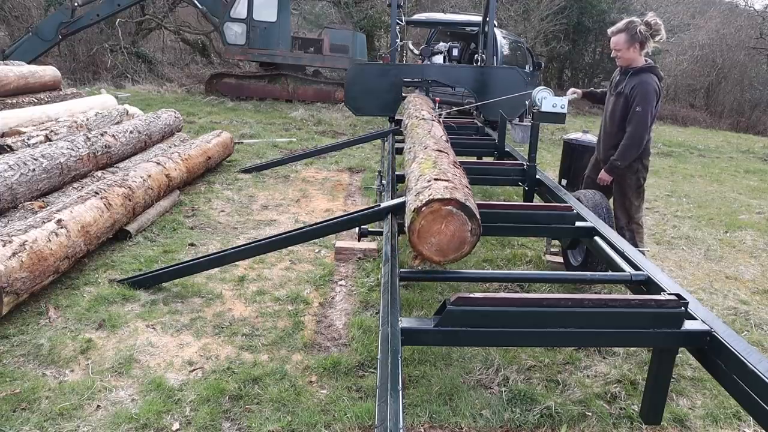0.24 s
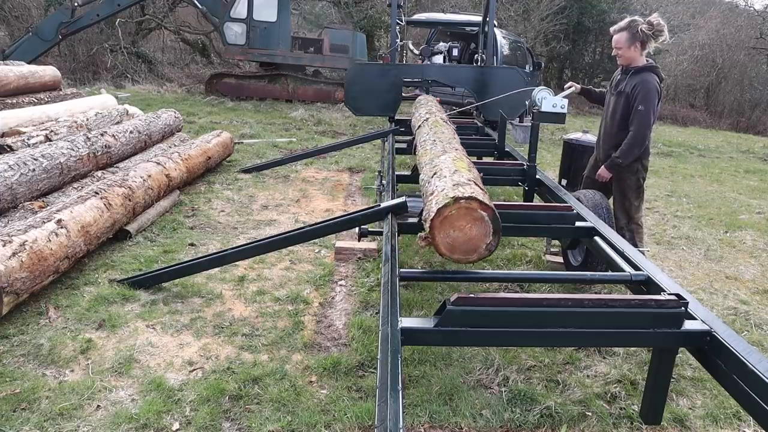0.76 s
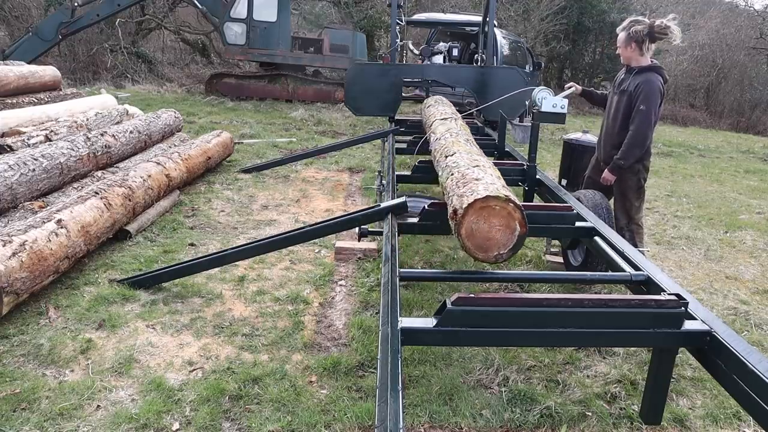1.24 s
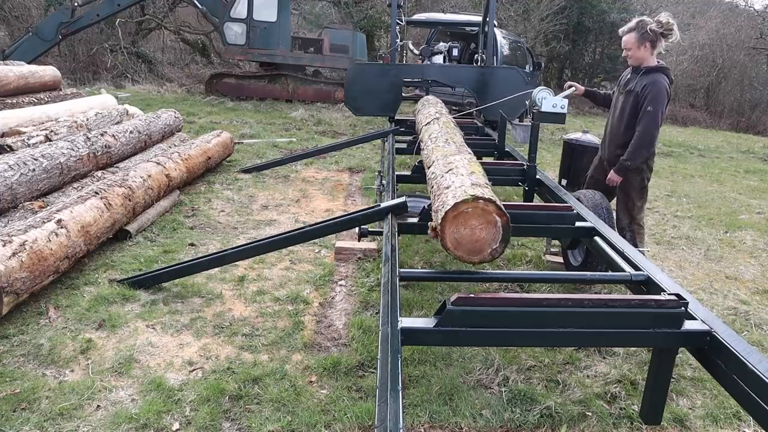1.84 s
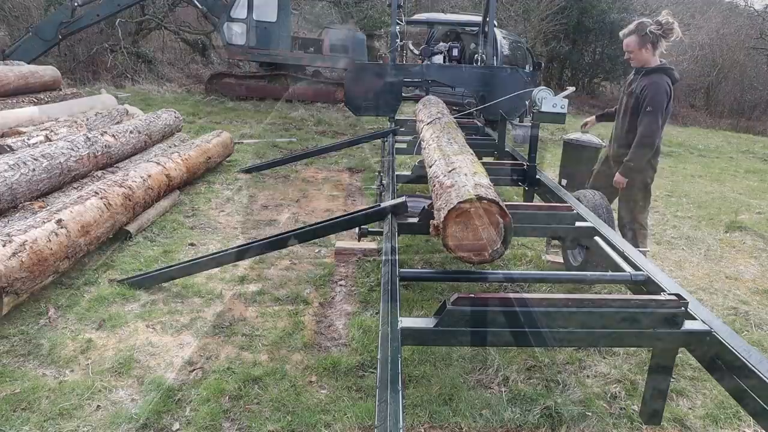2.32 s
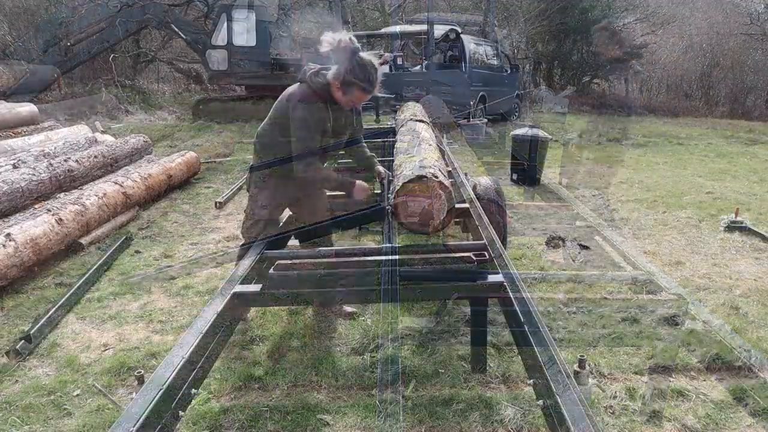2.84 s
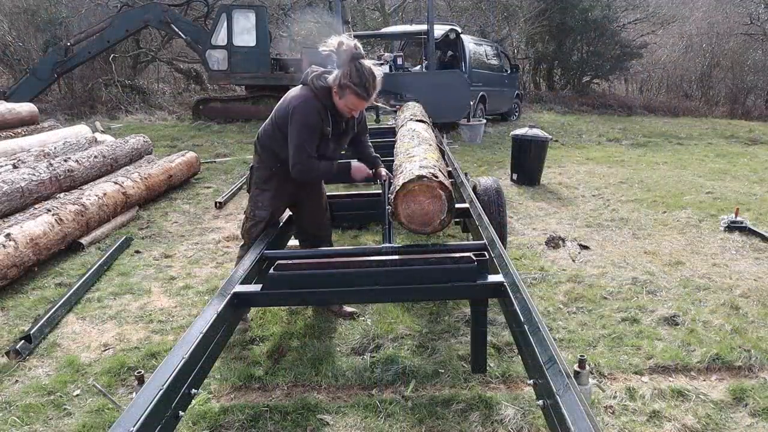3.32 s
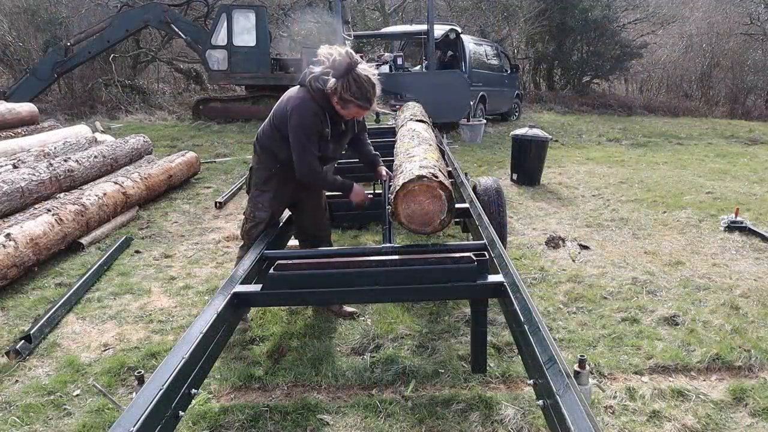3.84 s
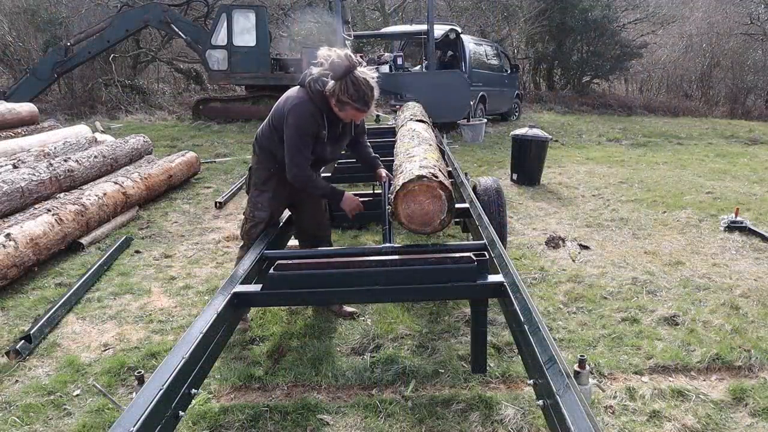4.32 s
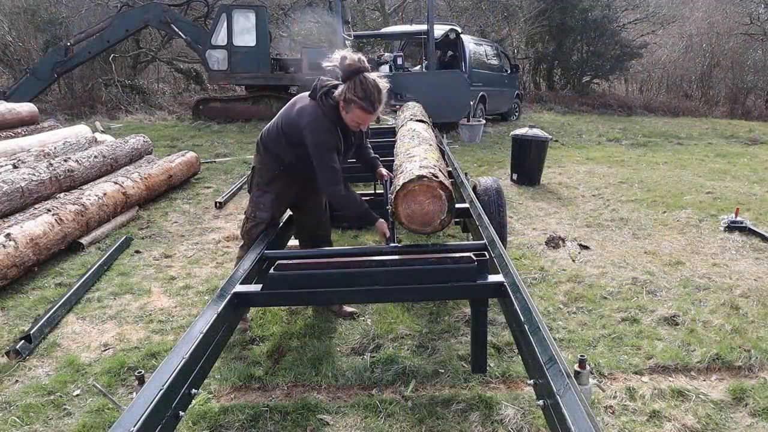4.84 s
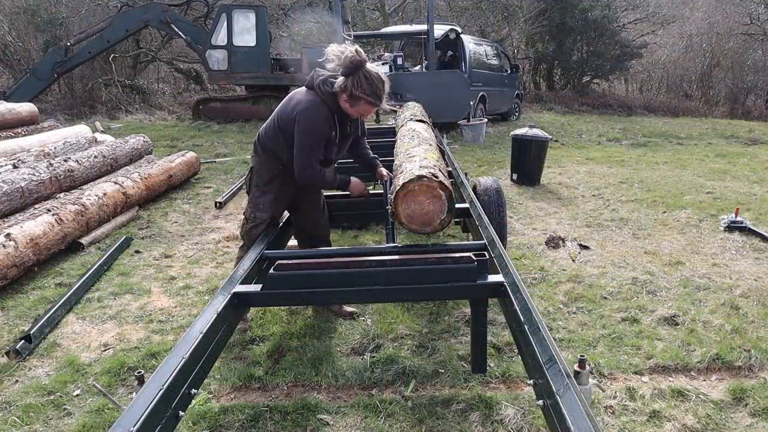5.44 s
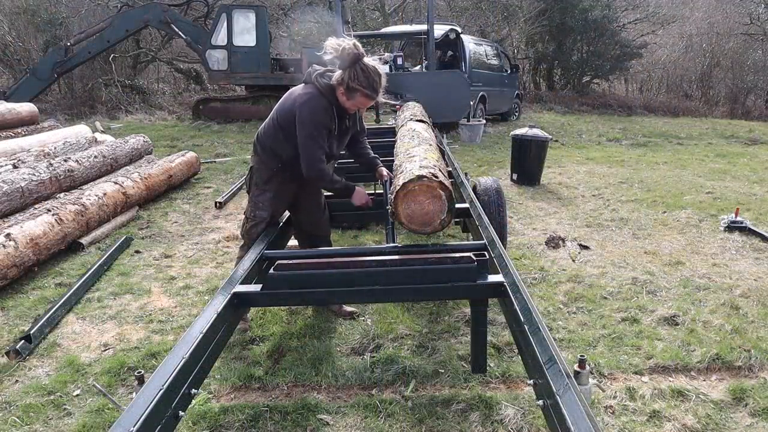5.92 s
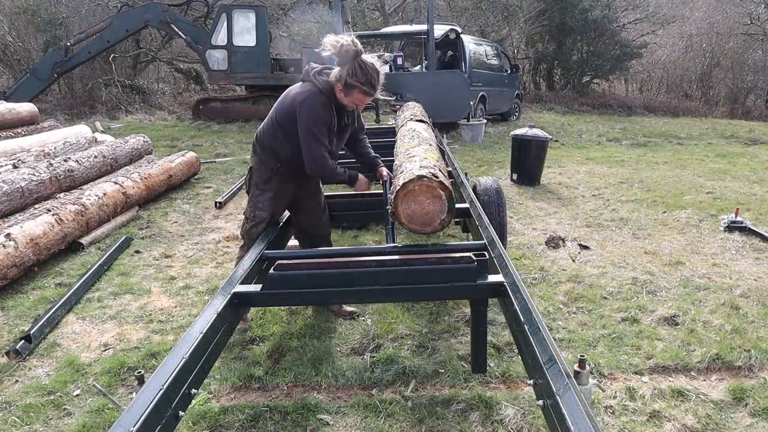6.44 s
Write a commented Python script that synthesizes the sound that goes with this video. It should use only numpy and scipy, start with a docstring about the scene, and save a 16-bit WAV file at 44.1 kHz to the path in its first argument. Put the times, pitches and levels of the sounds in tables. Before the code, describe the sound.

A burst of rapid ratchet clacks slows and stops within half a second. Wind rumble drops away, leaving quiet air and small high birds. Leafy wash swells back while a clamp rattles softly, then knocks hard on a steel bed several times. After a strong gust, a double-edged slam booms and rings, followed by faint ticks and rubbing. Open field, wind-struck stereo microphone.

```python
"""A hand winch drags a log onto a steel sawmill bed: grinding gears, clacking pawl, a drum squeaking between teeth.
As it stops, gears and cable settle and small birds whistle; the wash of wind in the trees sinks, then returns.
A log clamp is knocked along the bed, a sleeve brushes past, and the clamp slams home with a ringing clank.
Wind buffets the microphone throughout. Metal is contact grains through decaying rings, or tones for squeaks
and hums; birds are gliding tones; wind is shaped noise and single pressure pulses."""
import sys
import numpy as np
from scipy import signal
from scipy.fft import rfft, irfft, next_fast_len
from scipy.io import wavfile

SR = 44100
rng = np.random.default_rng(int(sys.argv[2]) if len(sys.argv) > 2 else 0)


def digitize_waveform(pressure):
    """Quantize a signal to 16-bit integers and store it at the path in sys.argv[1].

    Rows of a 2-D input are taken as channels; values are limited to [-1, 1].
    """
    field = np.atleast_2d(pressure).T
    bounded = np.clip(field, -1, 1)
    quanta = np.round(bounded * 32767).astype(np.int16)
    wavfile.write(sys.argv[1], SR, quanta)


N = 294139

# Levels are relative: each source's own trim comes on top.
# pawl dropping off a tooth: (time [s], level [dB], fade-in of sliding contacts [s])
PAWL_DROPS = [(.005, -17.5, .006), (.056, -16.5, 0.0092), (.102, -18, 0.0087), (.142, -20, 0.0024),
              (.218, -22.5, 0.0022), (0.303, -17.5, 0.0012), (.362, -18, 0.0093), (0.449, -32, 0.0029),
              (.474, -17.5, 0.0049)]
# gears and cable settling as the crank stops: (time [s], level [dB], decay of rattle [s])
SETTLING = [(.517, -41.5, 0.0052), (0.563, -57, 0.013), (.603, -47, 0.0058), (0.644, -50, .005),
            (.719, -53, 0.0049), (0.751, -44, 0.0023), (.766, -41.5, .008), (.792, -44.5, .014),
            (.848, -62, .006), (0.957, -49, 0.022), (1.05, -61, .004), (1.107, -49, .012)]
# duller tone of those soft contacts: (frequency [Hz], gain [dB])
SETTLING_TONE = [(900, 6), (2500, -0.5), (4500, -1), (9000, -12)]
# winch housing's colour: (frequency [Hz], level [dB per Hz]); its ring: (frequency [Hz], t60 [s])
WINCH_COLOUR = [(250, -4.5), (560, -12), (850, -3.5), (1020, -6.5), (1200, -2), (1470, -11), (1750, 8.5),
                (2000, -2.5), (2280, 6.5), (2700, -2), (4300, -3.5), (4750, -6.5), (5200, 1.5),
                (5700, -6.5), (10500, -8), (12500, -27), (15000, -65)]
WINCH_T60 = [(500, 0.12), (1800, 0.04), (5000, 0.053), (11000, 0.05)]
# modes of the winch frame: (frequency [Hz], level [dB], t60 [s])
FRAME_MODES = [(510, -3, 0.16), (612, -4, .25), (887, 4.5, 0.077), (1795, -1, 0.19), (1845, 2, .14),
               (2110, 3, 0.07), (2296, -3, 0.093), (2810, 2, .1), (4830, -3.5, 0.36), (5100, 0, 0.086),
               (5500, -0.5, .076)]

# a louder drop is a full tooth under load; the slowing of the crank counts from the fast tooth
FULL_TOOTH_DB, FAST_TOOTH_S = -27, .05
# the drum sticks after each clack, then slips with an arching pitch that is higher on longer teeth
SQUEAK_HZ, SQUEAK_HZ_PER_S, SQUEAK_ARCH_HZ = 8970, 1600, 312
STICK_SHARE, SQUEAK_DB, SQUEAK_DB_PER_HALVING = 0.13, -44.5, -5
# the gears soften each time the speed halves, and die away after the last tooth
GRIND_DB, GRIND_DB_PER_HALVING, GRIND_STOP_DB_PER_S = -50, -7.5, -110
# under load the pawl bounces once after each drop
BOUNCE_S, BOUNCE_DB, BOUNCE_RATTLE_S = .009, -8.5, 0.005
# it sings briefly as it rides over the tip of each tooth
SING_HZ, SING_DB, SING_LEAD_S, SING_S = 5270, -47.5, .007, .024

# clamp slamming home: (time [s], level [dB], fade-in of sliding contacts [s], decay of rattle [s])
SLAMS = [(4.909, -6, 0.0025, 0.0039), (4.917, 0, 0.0036, 0.0015), (4.921, 3.5, 0.003, 0.0022)]
# colour of the slam: (frequency [Hz], level [dB per Hz]); its ring: (frequency [Hz], t60 [s])
SLAM_COLOUR = [(88, -23), (150, -36), (470, -16), (720, -5.5), (940, 10), (1220, 2.5), (1400, -9),
               (1650, -6), (2050, -4.5), (2400, -13.5), (3050, -19), (3370, -10.5), (3550, -10),
               (3800, -15), (4150, -22), (4600, -21), (5200, -15.5), (6600, -28), (10900, -34.5),
               (15500, -62)]
SLAM_T60 = [(200, 0.095), (1000, 0.0078), (4000, 0.047), (12000, 0.055)]
# colour of the bed: (frequency [Hz], level [dB per Hz]); its ring: (frequency [Hz], t60 [s])
BED_COLOUR = [(50, -18), (130, 6), (350, -6), (600, 9), (950, 8.5), (1400, 2), (1850, 8), (2400, -5),
              (3800, -6), (4500, -17), (5200, -6), (7000, -19), (14000, -44)]
BED_T60 = [(120, 0.7), (500, 0.29), (1800, 0.27), (4000, 0.3), (10000, 0.043)]
# ringing modes of the steel bed and clamp: (frequency [Hz], level [dB], t60 [s])
STEEL_MODES = [(230, -24, 1.8), (296, -14, 0.55), (361, -20, 0.44), (505, -6, .3), (608, -2, 0.26),
               (810, -23, 0.4), (920, -5, 0.28), (970, -1.5, 0.33), (1011, -6.5, 0.48), (1557, -23, 0.88),
               (1590, -23, 1.7), (1756, -3.5, 0.48), (1814, -9, 0.45), (1890, -22, 1.2), (2067, -2, 0.11),
               (2300, -21.5, 0.66), (2560, -16, 0.38), (3400, -28, 0.27), (3779, 2, 0.1), (4020, -18, 0.32),
               (3840, -14.5, 0.22), (5020, -12, 0.24), (5210, 2.5, 0.074), (8100, -32, 0.38)]
# thin, long ring of the clamp bar: (frequency [Hz], level [dB], t60 [s])
BAR_MODES = [(9437, -4, 1.6), (9430, -18, 1.7)]

# clamp knocking on the bed: (time [s], level [dB], brightness above 2.5 kHz [dB], clang near 1.9 kHz [dB],
# body below 700 Hz [dB], decay of rattle [s], pitch of the boom [Hz])
KNOCKS = [(2.198, -36, -22, -11, -9, 0.0019, 600), (2.26, -37.5, -13, -1, 5.5, 0.006, 612),
          (2.356, -40, -12, -2, 3, .002, 570), (2.377, -36, -9, 2.5, 6, 0.0074, 710),
          (2.469, -27, -13, 0, 5, 0.017, 547), (2.524, -35, -16, -2, -7, 0.0012, 596),
          (2.601, -35.5, -10, -8, 12.5, 0.0027, 535), (2.611, -28.5, -5, -2, 2.5, 0.014, 630),
          (2.661, -29.5, -8, -12, 6.5, 0.008, 806), (2.679, -19.5, -1, -3.5, 4, 0.0076, 712),
          (2.686, -28, -7, -3.5, 8.5, 0.01, 808), (2.715, -37, -12, -12, 16, 0.0082, 516),
          (2.788, -27, -9, -9, -2, .002, 686), (2.8, -39, -12, -10, 15, 0.0055, 544),
          (3.157, -7, -12.5, 0, 1, 0.0028, 522), (3.266, -9, -3, -2, -10.5, 0.0089, 690),
          (3.274, -9, -11, 1, -5, 0.0028, 544), (3.283, -14, 0, 1.5, 5, 0.0031, 625),
          (3.48, -19, 5, 1, -4.5, 0.00094, 873), (3.512, -12, -23, -5.5, -1.5, 0.0036, 531),
          (3.632, -24, -20, -1, 0.5, 0.00079, 686), (3.656, -20.5, -11, 2.5, 7, 0.0038, 565),
          (4, -22, -1, -10, -20, 0.0045, 1063), (4.023, -12, -5.5, 5, 2.5, 0.0082, 505),
          (4.985, -22, -22, -12, 3, .005, 504)]
# colour of the clamp: (frequency [Hz], level [dB per Hz]); its ring: (frequency [Hz], t60 [s])
CLAMP_COLOUR = [(100, -27), (260, -9.5), (350, -16), (430, -10), (540, -3), (850, -2), (1150, -1),
                (1400, -8.5), (1800, -4.5), (2050, -5.5), (2280, -33.5), (2650, -8.5), (3050, -21),
                (3550, -7), (4300, -23.5), (5200, -14), (8000, -39.5), (14000, -71)]
CLAMP_T60 = [(250, 0.37), (550, 0.23), (1200, 0.046), (2000, 0.093), (6000, 0.066)]
# modes of the clamp bracket: (frequency [Hz], level [dB], t60 [s])
BRACKET_MODES = [(259.4, -19, 0.17), (416, -10.5, 0.17), (495, -4, 0.22), (622.2, 0.5, 0.14),
                 (695, -8, 0.16), (1001, -13, 0.53), (1061, 9.5, 0.056), (1180, 5, 0.1), (1748, -6.5, 0.29),
                 (1813, -1, 0.16), (1955, -3.5, 0.14), (2046, -19, 0.06), (2617, -7, 0.066),
                 (3710, -17.5, 0.082), (5010, -14, 0.2)]
# boom of the bed: level against the knock's body, time constant of its rise, ring time
BOOM_DB, BOOM_RISE_S, BOOM_T60 = -19.5, 0.0062, .17

# light metal contacts: (time [s], level of the tick [dB], level of the clamp pin's ring [dB])
TICKS = [(0.645, -55, -90), (.683, -59, -90), (.717, -60, -90), (2.369, -50, -54.5), (2.585, -43, -75),
         (2.65, -32.5, -56), (2.771, -38, -75), (3.132, -39, -34), (3.203, -32, -75), (3.481, -21.5, -44),
         (4.005, -67, -42), (4.902, -31, -75), (4.906, -20.5, -61), (5.964, -37.5, -75), (6.255, -37, -67)]
# modes of the clamp pin: (frequency [Hz], level [dB], t60 [s])
PIN_MODES = [(3404, 4, 0.075), (3500, -14, 0.035), (5500, -20, 0.081)]
# rubbing of steel on steel: (time [s], length [s], level [dB], pitch [Hz])
RUBS = [(0.748, 0.073, -62, 900), (0.898, 0.1, -71.5, 930), (1.085, 0.054, -73, 930),
        (2.611, 0.066, -55.5, 2060), (2.614, 0.035, -58, 1870), (3.062, 0.2, -51, 930),
        (5.328, .06, -64, 950), (5.711, 0.07, -60, 930), (6.062, 0.077, -58, 930),
        (6.219, 0.028, -56.5, 930), (6.537, 0.054, -55, 930), (6.628, 0.055, -52.5, 930)]

# bird notes: (time [s], length [s], first pitch [Hz], last pitch [Hz], bend of the middle [Hz], level [dB])
BIRDS = [(0.653, 0.075, 4000, 4000, -84, -76), (.695, 0.062, 6900, 6450, -100, -82),
         (0.785, 0.077, 4270, 3960, -150, -74.5), (0.81, 0.068, 6030, 5500, -250, -76.5),
         (.918, 0.049, 7100, 4900, -500, -74.5), (1.027, 0.09, 4510, 3980, -380, -74),
         (1.032, .035, 4300, 6100, 102, -76), (1.059, 0.053, 6120, 5540, 139, -72),
         (1.136, 0.11, 6100, 6100, -3, -76), (1.174, 0.03, 4200, 6500, 195, -78),
         (1.198, 0.077, 6300, 4660, -280, -76.5), (1.335, 0.071, 5850, 5120, 451, -79),
         (1.35, 0.034, 3130, 3500, 60, -73), (1.41, 0.11, 4980, 4570, -140, -75.5),
         (1.44, 0.089, 7450, 8100, -350, -81), (1.52, 0.032, 5270, 4500, 1, -86),
         (1.59, 0.059, 5500, 5300, -40, -78), (1.813, 0.1, 4860, 4530, -120, -77.5),
         (1.905, .04, 5340, 4600, 0, -84), (2.524, 0.1, 5270, 4700, -300, -64.5),
         (2.844, 0.037, 7300, 6900, -90, -64), (2.883, 0.092, 5400, 4520, -320, -59),
         (3.291, .095, 4640, 3280, 450, -60), (3.665, 0.062, 6770, 4700, -500, -55.5),
         (3.71, 0.043, 4470, 3500, -300, -59.5), (3.988, 0.021, 6700, 3850, -300, -51),
         (4.001, 0.035, 4100, 3830, -53, -50), (4.026, 0.061, 3960, 3320, 376, -50.5),
         (4.107, 0.018, 4550, 4040, 298, -50), (6.248, 0.072, 3830, 3500, 65, -56.5)]

# colour of the trees when calm, then when risen: (frequency [Hz], level [dB per Hz])
CALM_COLOUR = [(180, -27), (300, -3.5), (372, -2), (468, 0), (781, 0.5), (1200, -3.5), (1390, -1.5),
               (5050, -11), (11300, -24.5), (15500, -32.5)]
RISEN_COLOUR = [(120, -23), (200, -2), (249, -1.5), (321, -2.5), (506, 1), (742, 1), (906, 2), (1300, -2),
                (3750, -9), (4030, -10), (8980, -22), (11200, -22.5), (15500, -42)]
# swell of the wind in the trees: (time [s], level [dB])
WASH = [(0, -54), (.6, -69.5), (1.2, -73.5), (1.95, -69.5), (2.25, -64.5), (2.6, -57), (3.05, -51),
        (4.0, -51), (4.7, -51.5), (5.5, -53), (6.6, -52)]

# colour of the wind's buffeting, then of its deep rumble: (frequency [Hz], level [dB per Hz])
BUFFET_COLOUR = [(30, -25.5), (70, -3.5), (110, 3.5), (180, -2), (260, -8.5), (360, -16), (500, -23.5),
                 (1000, -74.5)]
RUMBLE_COLOUR = [(12, 0.5), (25, -5), (50, -1), (75, 1.5), (120, -11.5), (300, -84)]
# breeze at the microphone, then the deep rumble: (time [s], level [dB])
BREEZE = [(0, -49), (.15, -47), (.7, -43), (.8, -46.5), (.9, -62.5), (1.2, -72), (1.95, -62.5), (2.2, -48),
          (3.05, -56.5), (3.2, -46), (3.45, -59), (3.8, -52), (4.25, -43.5), (4.65, -41.5), (5.2, -62),
          (6.67, -58.5)]
RUMBLE = [(0, -64), (.15, -50), (.8, -47.5), (1.0, -91), (1.65, -75), (1.85, -62), (2.1, -77), (3.2, -53.5),
          (3.75, -63), (4.1, -37), (4.55, -43.5), (5.2, -64), (6.45, -55.5), (6.67, -61)]
# flurries of buffeting: (time [s], level [dB])
EDDIES = [(.35, -41), (.485, -38), (0.641, -35.5), (1.538, -47), (2.039, -54.5), (2.121, -44.5),
          (2.166, -43), (2.312, -44), (2.367, -39), (2.494, -45), (4.188, -35), (4.288, -31.5),
          (4.623, -32), (4.669, -35.5)]
EDDY_S = 0.015  # standard deviation of an eddy's bell shape
# how much the two channels differ in the wind: (time [s], level [dB])
UNLIKE = [(0, 1.5), (.82, -0.5), (1.0, -28.5), (3.8, -20.5), (4.1, -3), (4.4, 1.5), (4.6, -16), (6.67, -6)]
# single pressure pulses of the wind: (time [s], peak level [dB], centre frequency [Hz])
THUMPS = [(0.207, -35, 129), (0.25, -38, 210), (.272, -31, 110), (.384, -36, 189), (0.441, -31, 149),
          (0.505, -33, 140), (.533, -35, 286), (0.592, -37, 150), (0.64, -39, 200), (0.685, -36, 230),
          (0.728, -36, 280), (.766, -38, 184), (0.831, -43, 120), (0.866, -51, 200), (0.886, -47, 181),
          (1.599, -50, 150), (1.895, -43, 135), (2.381, -34.5, 202), (2.555, -39.5, 150), (3.895, -32, 140),
          (3.935, -30.5, 129), (4.068, -28, 129), (4.092, -34, 160), (4.108, -33, 90), (4.208, -25, 110),
          (4.252, -22.5, 100), (4.286, -22, 188), (4.354, -23.5, 170), (4.38, -22.5, 122),
          (4.445, -32.5, 127), (4.48, -32, 118), (4.536, -25, 134), (4.555, -24, 110), (4.635, -23.5, 167),
          (4.774, -34, 173), (4.803, -27, 142)]

# stereo width of each source: (frequency [Hz], side minus mid [dB])
WINCH_WIDTH = [(150, -29), (400, -18.5), (950, -13), (2000, -1), (3500, -1.5), (6000, 1.5), (9300, 5),
               (13000, 15)]
CLAMP_WIDTH = [(60, -50), (150, -57), (380, -16), (950, -13.5), (2200, -10), (3600, 1.5), (6000, 0),
               (15000, -8)]
SLAM_WIDTH = [(60, -38), (150, -48), (380, -17), (950, -11.5), (2200, -8), (3600, 0.5), (6000, 0.5),
              (10000, -2.5), (15000, 13)]
AIR_WIDTH = [(40, -21), (130, -26), (290, -3), (700, -0.5), (1410, 3.5), (3100, 5), (6820, 6), (15000, 5.5)]
GUST_WIDTH = [(40, -4), (80, -12.5), (160, -3), (300, 2.5)]

EDGE_HZ = 15700  # upper band limit
RING_TIME = np.arange(round(1.1 * SR)) / SR  # seconds


def gain_of(db):
    """Decibels to amplitude."""
    return 10 ** (np.asarray(db) / 20)


def evened(x):
    """Scales to rms 1."""
    return x / np.sqrt(np.mean(x ** 2) + 1e-20)


def read(points, hz):
    """Reads a table on a log-frequency axis."""
    f, value = np.transpose(points)
    return np.interp(np.log(hz + 1), np.log(f + 1), value)


def follow(curve):
    """A curve's value at every sample."""
    return np.interp(np.arange(N) / SR, *np.transpose(curve))


def add(mix, s, sound):
    """Mixes a sound in at time s, trimming what falls outside."""
    start = round(s * SR)
    sound = sound[..., max(-start, 0):]
    part = mix[..., max(start, 0):][..., :sound.shape[-1]]
    part += sound[..., :part.shape[-1]]


def colour(x, points, size=4096):
    """Causal minimum-phase filter with the given (frequency [Hz], gain [dB]) response."""
    hz = abs(np.fft.fftfreq(size, 1 / SR))
    log_gain = np.log(gain_of(read(points, hz)))
    response = np.exp(np.conj(signal.hilbert(log_gain)))
    taps = np.fft.ifft(response).real[:size // 2]
    return signal.oaconvolve(x, taps)[:len(x)]


def wander(count, hz):
    """Smooth random drift of about rms 1; hz sets how fast it moves."""
    size = next_fast_len(max(count, 16384))
    lowpass = np.exp(-(np.fft.rfftfreq(size, 1 / SR) / hz) ** 2)
    drift = irfft(rfft(rng.standard_normal(size)) * lowpass, size)
    return evened(drift)[:count]


def stereo(mid, side, width):
    """Left and right from a centre sound and a sideways one."""
    side = colour(side, width)
    return np.array([mid + side, mid - side])


def dense_ring(spectrum, t60, size=26000):
    """Noise standing for countless close modes, each band dying at its own speed; energy 1."""
    hz, t, bands = signal.stft(rng.standard_normal(size), SR, nperseg=128)
    decay = gain_of(-60 * t / read(t60, hz)[:, None])
    ring = signal.istft(bands * decay, SR, nperseg=128)[1]
    ring = colour(ring[:size], spectrum)
    return np.pad(ring / np.linalg.norm(ring), (0, len(RING_TIME) - size))


def modes(table):
    """A few clear modes: sines of random phase that decay exponentially."""
    ring = 0
    for hz, db, t60 in table:
        decay = gain_of(db - 60 * RING_TIME / t60)
        ring = ring + decay * np.sin(2 * np.pi * (hz * RING_TIME + rng.random()))
    return ring


def sound_of(force, ring):
    """What a part radiates under a force."""
    return signal.oaconvolve(force, ring)[:N]


def contact(slide, rattle, chatter=1.0, grains_per_s=2500):
    """One blow, a tenth of a second in: tiny contacts swell before it and rattle away after it; energy 1."""
    t = np.arange(-SR // 10, SR // 10) / SR
    grains = rng.standard_normal(len(t)) * (rng.random(len(t)) < grains_per_s / SR)
    fade_s = np.maximum(np.where(t < 0, slide, rattle), 1e-4)
    grains *= np.exp(-abs(t) / fade_s)
    blow = (t == 0)
    force = chatter * grains / (np.linalg.norm(grains) + 1e-9) + blow
    return force / np.linalg.norm(force)


def clatter(force, spectrum, t60, count=3, size=14000):
    """The tiny contacts of one blow land on several spots, each with its own dense ring."""
    spot = rng.integers(0, count, len(force))
    rings = [dense_ring(spectrum, t60, size)[:size] for _ in range(count)]
    return sum(signal.fftconvolve(force * (spot == k), ring) for k, ring in enumerate(rings))


def whistle(hz, db, waver, waver_hz):
    """A short wavering tone that follows a pitch curve, fading in and out."""
    hz = hz * (1 + waver * wander(len(hz), waver_hz))
    tone = np.sin(2 * np.pi * np.cumsum(hz) / SR)
    return gain_of(db) * evened(tone * signal.windows.tukey(len(hz), .7))


def teeth():
    """Each ratchet tooth's start and length [s], and halvings of crank speed against the fast tooth."""
    clacks = np.array([s for s, db, slide in PAWL_DROPS if db > FULL_TOOTH_DB])
    lengths = np.diff(clacks)
    return clacks[:-1], lengths, np.log2(lengths / FAST_TOOTH_S)


def winch(level_db=13, frame_db=-43, rasp=0.27):
    """The pawl sings, snaps down, bounces and rings the housing; the drum sticks and slips in between."""
    out, squeak = np.zeros((2, N)), np.zeros(N)
    frame = [modes(FRAME_MODES), modes(FRAME_MODES)]
    for s, db, slide in PAWL_DROPS:
        force = gain_of(db + level_db) * contact(slide, rattle=0.0024, chatter=1.8)
        if db > FULL_TOOTH_DB:
            bounce = contact(0.00086, BOUNCE_RATTLE_S, chatter=5.6)
            add(force, BOUNCE_S, gain_of(db + level_db + BOUNCE_DB) * bounce)
            sing_hz = np.full(round(SING_S * SR), SING_HZ)
            add(squeak, s - SING_LEAD_S, whistle(sing_hz, SING_DB, waver=0.01, waver_hz=300))
        for channel, clear in zip(out, frame):  # each clack gets fresh dense rings
            add(channel, s - 1 / 10, clatter(force, WINCH_COLOUR, WINCH_T60, size=8000))
            add(channel, s - 1 / 10, gain_of(frame_db) * signal.fftconvolve(force, clear))
    for s, db, rattle in SETTLING:
        force = gain_of(db + level_db) * contact(.002, rattle, chatter=1.6)
        for channel, clear in zip(out, frame):
            housing = clatter(force, WINCH_COLOUR, WINCH_T60, count=2, size=8000)
            clear_ring = gain_of(frame_db) * signal.fftconvolve(force, clear)
            add(channel, s - 1 / 10, colour(housing, SETTLING_TONE))
            add(channel, s - 1 / 10, colour(clear_ring, SETTLING_TONE))
    for s, length, slowing in zip(*teeth()):
        slip = np.linspace(0, 1, round((1 - STICK_SHARE) * length * SR))
        arch_hz = SQUEAK_ARCH_HZ * (np.sin(np.pi * slip) - .5)
        hz = SQUEAK_HZ + SQUEAK_HZ_PER_S * length + arch_hz
        db = SQUEAK_DB + SQUEAK_DB_PER_HALVING * slowing
        add(squeak, s + STICK_SHARE * length, whistle(hz, db, waver=.018, waver_hz=600))
    squeak *= 1 + rasp * wander(N, 270)  # the dry bearing grips unevenly
    mid = out[0] + squeak
    squeak_ring = dense_ring([(100, 0.0036), (9000, 0.0045)], WINCH_T60)
    scattered = out[1] + sound_of(squeak, squeak_ring)
    # a quarter-cycle phase shift of the mid ties the side to it
    lean = .55
    shifted = signal.hilbert(mid, next_fast_len(N)).imag[:N]
    return stereo(mid, lean * shifted + np.sqrt(1 - lean ** 2) * scattered, WINCH_WIDTH)


def gears(lump_db=6.5, grains_per_s=1100):
    """Tiny contacts between the gear teeth keep the winch housing stirred between clacks."""
    t = np.arange(N) / SR
    starts, lengths, slowing = teeth()
    stopped_s = np.clip(t - starts[-1] - lengths[-1], 0, 1)
    slowing_now = np.interp(t, starts + lengths / 2, slowing)
    level_db = GRIND_DB + GRIND_DB_PER_HALVING * slowing_now + GRIND_STOP_DB_PER_S * stopped_s
    grains = rng.standard_normal(N) * (rng.random(N) < grains_per_s / SR)
    force = evened(grains * gain_of(lump_db * wander(N, 60))) * gain_of(level_db)
    mid, side = (sound_of(force, dense_ring(WINCH_COLOUR, WINCH_T60)) for _ in range(2))
    return stereo(mid, side, WINCH_WIDTH)


def clank(level_db=10, bed_db=5, steel_db=-25, bar_db=-39):
    """The clamp scrapes home and strikes; the bed booms and rings, the bar sings on."""
    out, strike_s = np.zeros((2, N)), SLAMS[1][0]
    for channel in out:
        for s, db, slide, rattle in SLAMS:
            force = contact(slide, rattle, chatter=5.2, grains_per_s=5800)
            crash = clatter(force, SLAM_COLOUR, SLAM_T60, count=8, size=8000)
            add(channel, s - 1 / 10, gain_of(db + level_db) * crash / np.linalg.norm(crash))
        add(channel, strike_s, gain_of(bed_db) * dense_ring(BED_COLOUR, BED_T60))
        add(channel, strike_s, gain_of(steel_db) * modes(STEEL_MODES) + gain_of(bar_db) * modes(BAR_MODES))
    return stereo(*out, SLAM_WIDTH)


def knocks(level_db=10.5, bracket_db=-36):
    """Clamp blows, each with its own tone, wake the bracket's modes and make that span of the bed boom."""
    out = np.zeros((2, N))
    bracket = [modes(BRACKET_MODES), modes(BRACKET_MODES)]
    for s, db, bright_db, clang_db, body_db, rattle, boom_hz in KNOCKS:
        tone = [(620, body_db), (1100, 0), (1400, 0), (1750, clang_db), (2100, clang_db), (3000, bright_db)]
        force = gain_of(db + level_db) * contact(0.00058, rattle, chatter=1.54)
        for channel, clear in zip(out, bracket):
            ring = gain_of(bracket_db) * signal.fftconvolve(force, clear)
            add(ring, 0, clatter(force, CLAMP_COLOUR, CLAMP_T60))
            add(channel, s - 1 / 10, colour(ring, tone))
        boom = modes([(boom_hz, db + body_db + BOOM_DB, BOOM_T60)])
        add(out[0], s, boom * (1 - np.exp(-RING_TIME / BOOM_RISE_S)))
    return stereo(*out, CLAMP_WIDTH)


def ticks(level_db=7, direct=0.83):
    """Sharp little contacts: a click and a short dense ring, with the clamp pin pinging in some."""
    out = np.zeros((2, N))
    tone = [(500, 5.0), (3500, 5), (7000, -1.0), (12000, 2.0), (15000, -26)]
    snap = colour(signal.unit_impulse(len(RING_TIME)), tone)
    snap *= direct / np.linalg.norm(snap)
    for s, tick_db, pin_db in TICKS:
        for channel in out:
            tick = snap + dense_ring(tone, [(1000, 0.0083), (10000, 0.029)])
            add(channel, s, gain_of(tick_db + level_db) * tick + gain_of(pin_db) * modes(PIN_MODES))
    return stereo(*out, [(1000, -34), (3400, -9), (8000, -1.5)])


def rubs(width_hz=90):
    """Each sliding contact hums in one resonance of the steel: a sine with a randomly drifting level."""
    out = np.zeros(N)
    for s, length, db, hz in RUBS:
        t = np.arange(round(length * SR)) / SR
        hum = wander(len(t), width_hz) * np.sin(2 * np.pi * hz * t)
        add(out, s, gain_of(db) * evened(hum * signal.windows.hann(len(t))))
    return out


def rustle(start_s=4.58, length_s=.26, level_db=-62, lump_db=3):
    """A sleeve brushes past as the hand reaches for the clamp: lumpy noise that swells and fades."""
    size = round(length_s * SR)
    noise = rng.standard_normal(size) * gain_of(lump_db * wander(size, 60))
    brush = colour(noise, [(2000, -27), (4800, 7), (6500, -2), (10000, -23)])
    out = np.zeros(N)
    add(out, start_s, gain_of(level_db) * evened(brush * signal.windows.hann(size)))
    return out


def birds(level_db=-2.6, echo_db=-5):
    """Thin sliding whistles from the trees, with a soft woodland echo of decaying noise."""
    song = np.zeros(N)
    for s, length, first_hz, last_hz, bend_hz, db in BIRDS:
        u = np.linspace(0, 1, round(length * SR))
        hz = first_hz + (last_hz - first_hz) * u + bend_hz * np.sin(np.pi * u)
        add(song, s, whistle(hz, db, waver=0.0139, waver_hz=110))
    echo_t60 = [(3000, 0.3), (8000, 0.47)]
    echo = [sound_of(song, dense_ring([(100, 0), (9000, 0)], echo_t60)) for _ in range(2)]
    return gain_of(level_db) * (song + gain_of(echo_db) * np.array(echo))


def trees(flutter_db=-0.8):
    """A wide wash of noise that crossfades from the calm colour to the risen one with its level."""
    level_db = follow(WASH)
    risen = np.clip((level_db - level_db.min()) / np.ptp(level_db), 0, 1)
    out = []
    for calm, leaves in rng.standard_normal((2, 2, N)):
        calm_air = np.sqrt(1 - risen) * evened(colour(calm, CALM_COLOUR))
        risen_air = np.sqrt(risen) * evened(colour(leaves, RISEN_COLOUR))
        out.append((calm_air + risen_air) * gain_of(level_db + flutter_db * wander(N, 5.6)))
    return stereo(*out, AIR_WIDTH)


def gusts(breeze_db=-2, lump_db=2.5, swell_db=2.5, swell_hz=12, leftward=1.0):
    """Breeze buffets the microphone in low lumps of noise; where the channels differ, the left gets more."""
    t = np.arange(N) / SR
    strength = gain_of(follow(BREEZE) + breeze_db + swell_db * wander(N, swell_hz))
    for s, db in EDDIES:
        bell = np.exp(-.5 * np.minimum(abs(t - s) / EDDY_S, 10) ** 2)
        strength = np.maximum(strength, gain_of(db) * bell)
    lumps = gain_of(lump_db * wander(N, 73))
    shared, own = (evened(colour(rng.standard_normal(N) * lumps, BUFFET_COLOUR)) * strength for _ in range(2))
    rumble = evened(colour(rng.standard_normal(N), RUMBLE_COLOUR, size=16384)) * gain_of(follow(RUMBLE))
    side = gain_of(follow(UNLIKE)) * (own + leftward * shared)
    return stereo(shared + rumble, side, GUST_WIDTH)


def thumps(level_db=-1, left_db=3.0):
    """An eddy striking the microphone makes one smooth push, with a slight suction before and after."""
    out, t = np.zeros(N), np.arange(-SR // 10, SR // 10) / SR
    for s, db, hz in THUMPS:
        u = (np.pi * hz * t) ** 2
        add(out, s - 1 / 10, gain_of(db + level_db) * (1 - 2 * u) * np.exp(-u))
    return out * gain_of([[left_db], [-left_db]])


def scene(winch_right_db=3.5):
    """The sawmill, with the winch off to the right, and the field around it."""
    crank = (winch() + gears()) * gain_of([[-winch_right_db], [winch_right_db]])
    metal = clank() + knocks() + ticks() + rubs()
    outdoors = birds() + trees() + gusts() + thumps()
    return crank + metal + rustle() + outdoors


def record(dry):
    """Rounds off the loudest peaks, then limits the band."""
    rounded = dry / (1 + (dry / .75) ** 4) ** (1 / 4)
    lowpass = signal.firwin(511, EDGE_HZ, window=("kaiser", 9), fs=SR)
    return signal.oaconvolve(rounded, lowpass[None], "same")


dry = scene()
out = record(dry)
digitize_waveform(out)
```